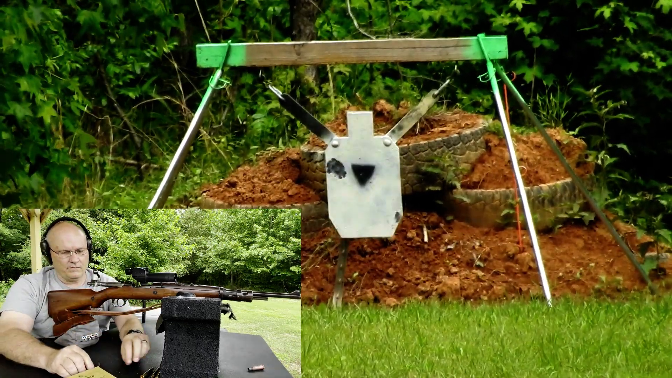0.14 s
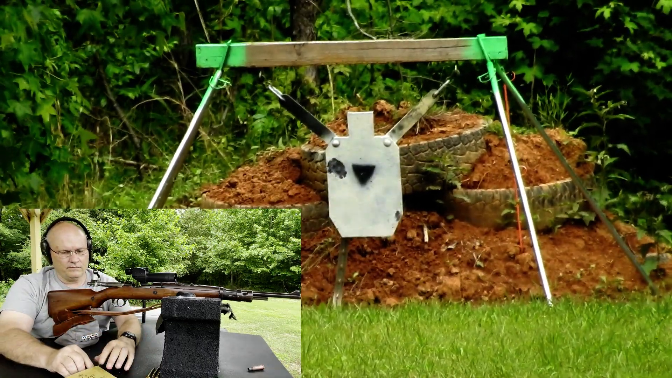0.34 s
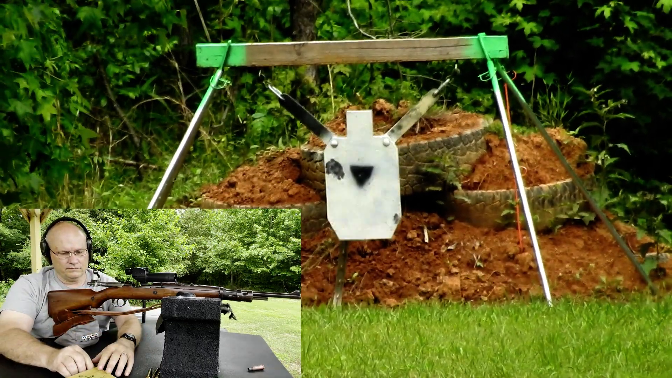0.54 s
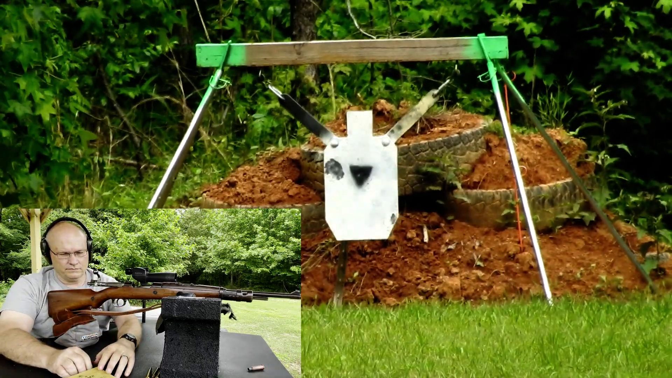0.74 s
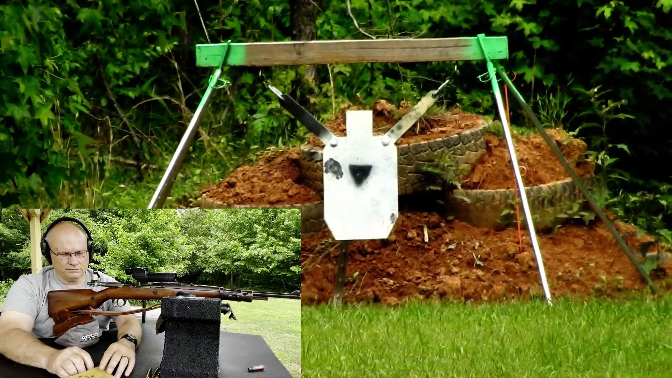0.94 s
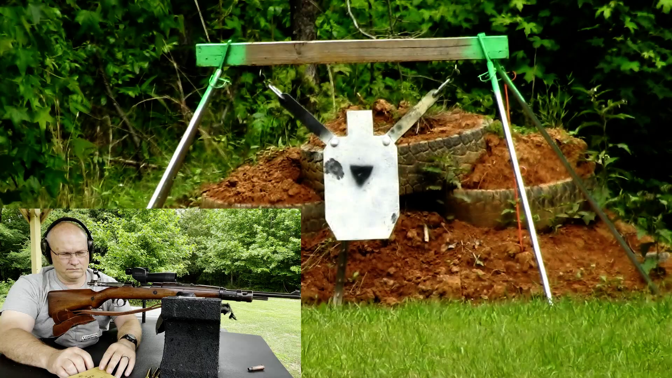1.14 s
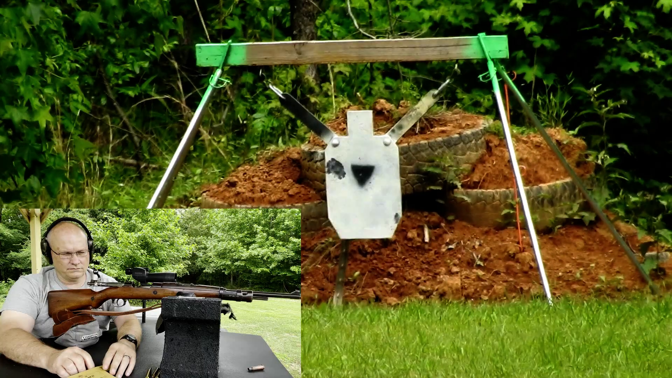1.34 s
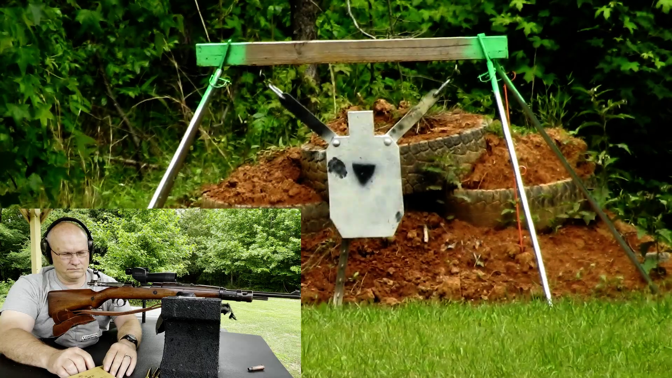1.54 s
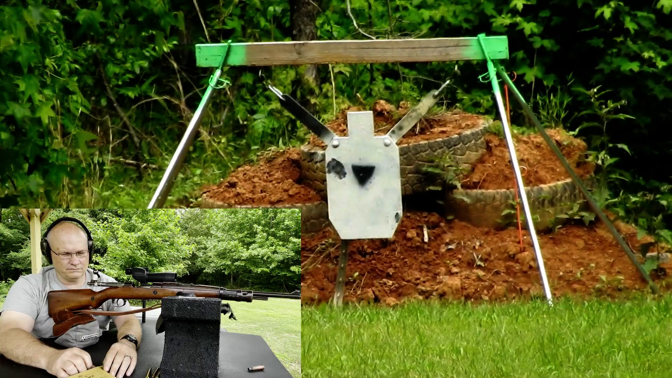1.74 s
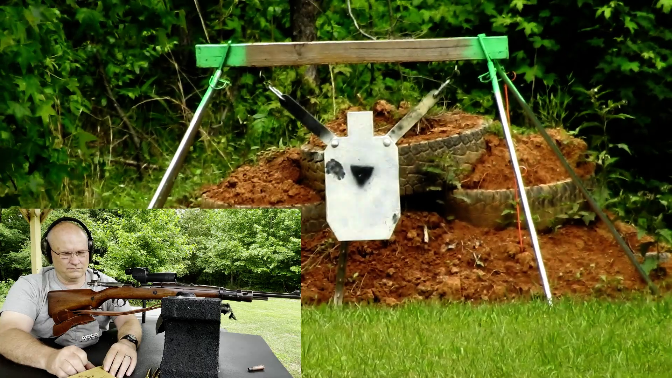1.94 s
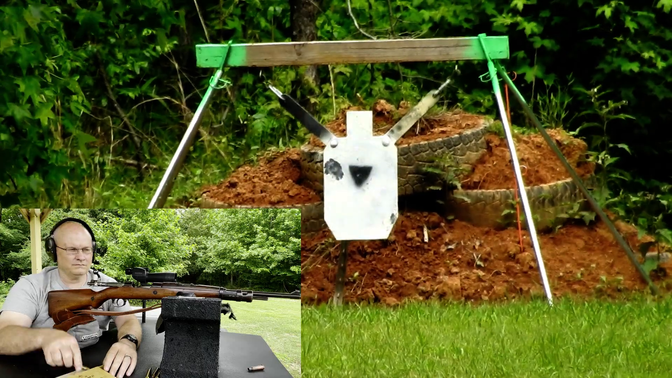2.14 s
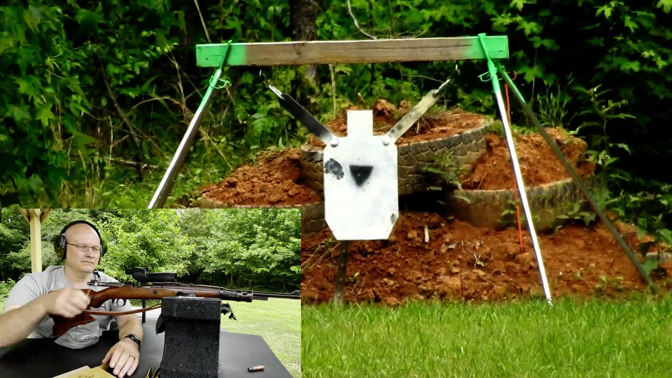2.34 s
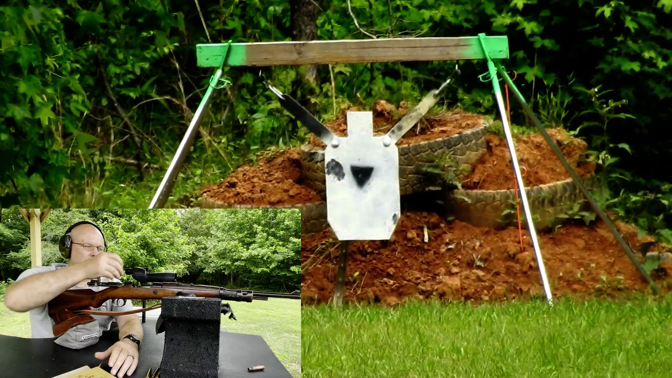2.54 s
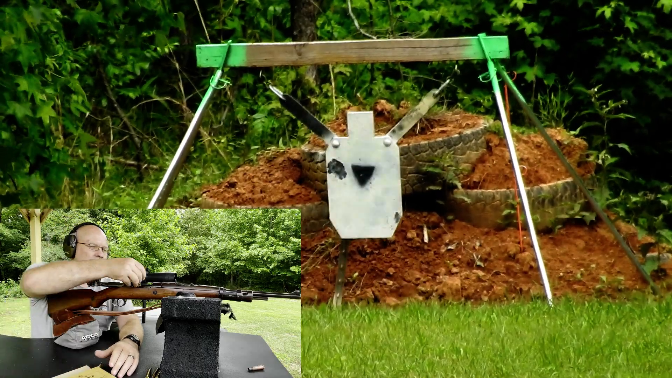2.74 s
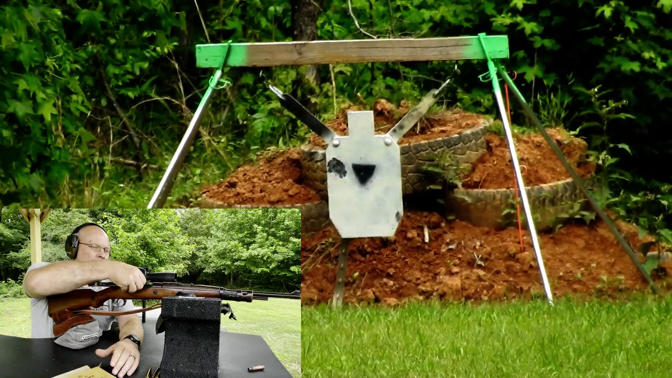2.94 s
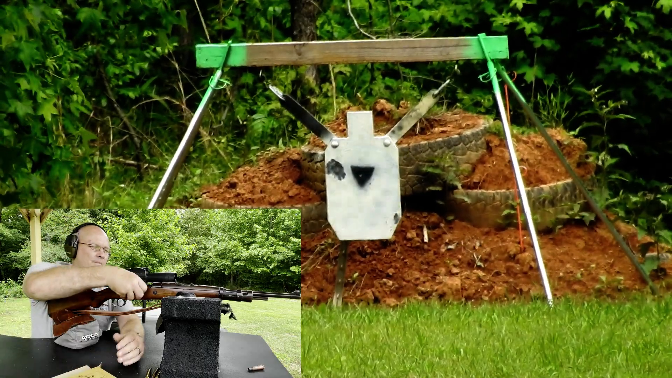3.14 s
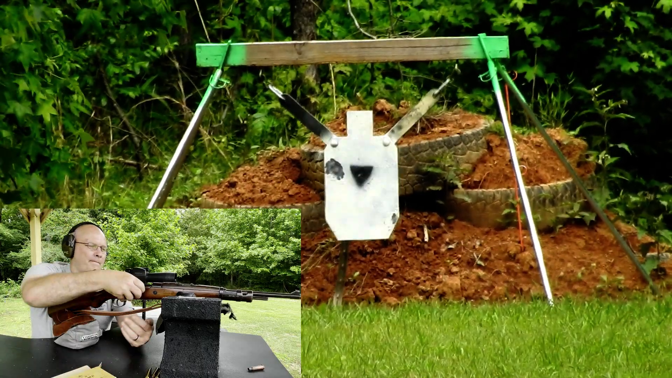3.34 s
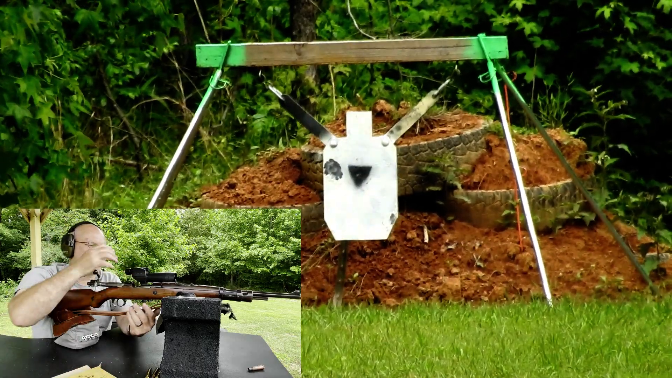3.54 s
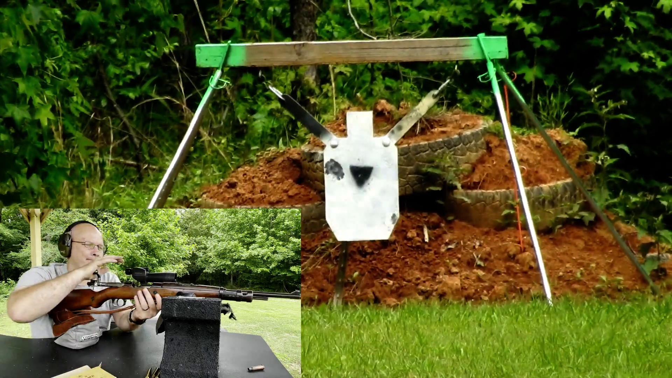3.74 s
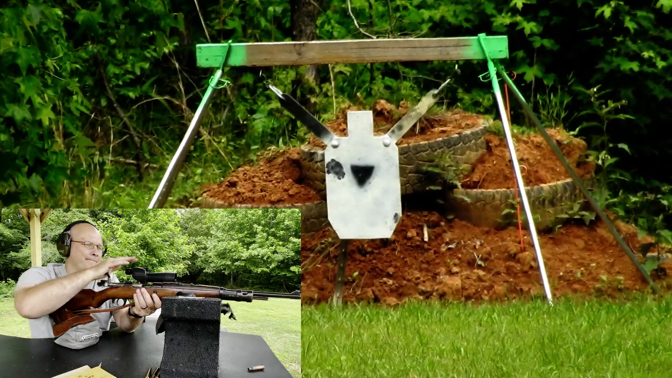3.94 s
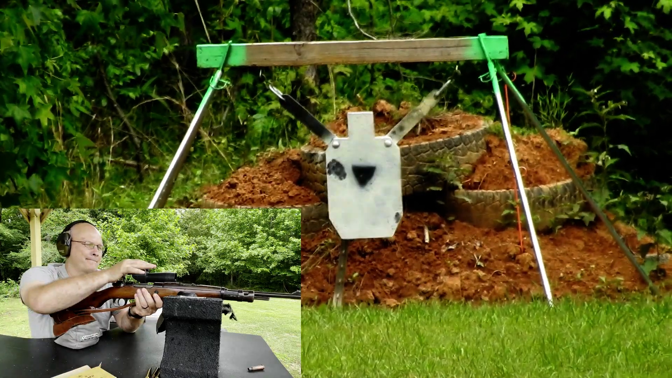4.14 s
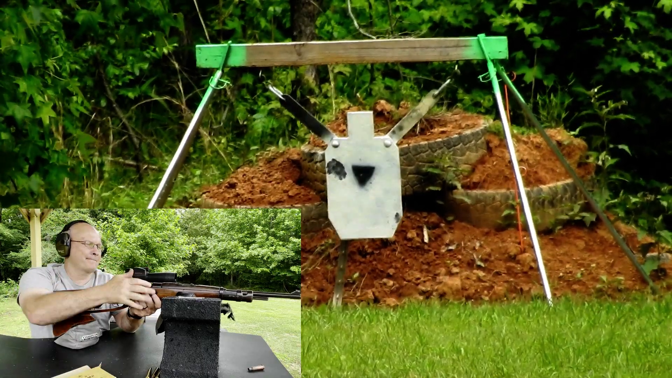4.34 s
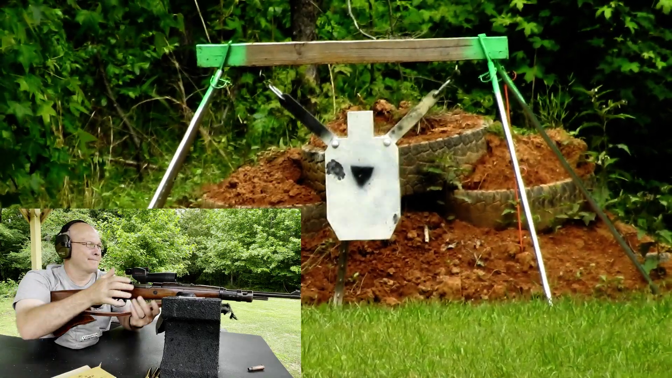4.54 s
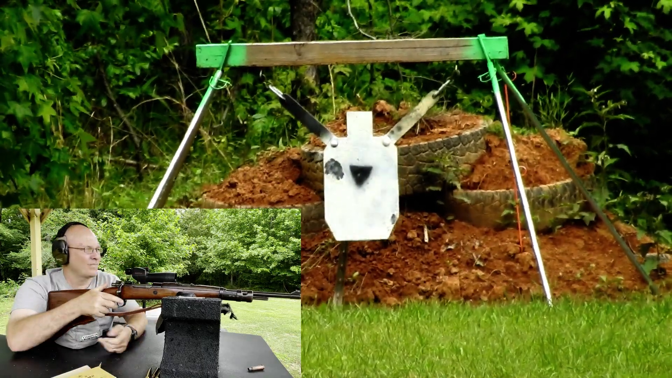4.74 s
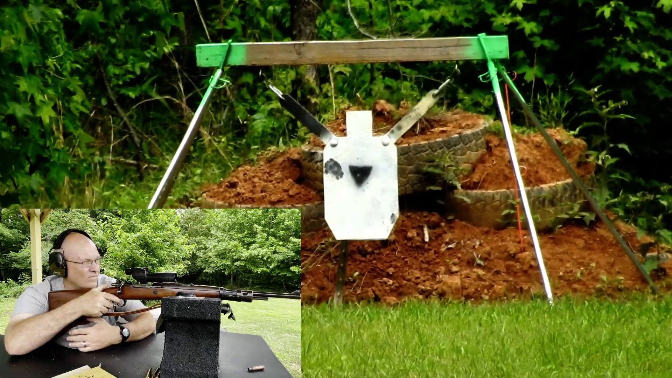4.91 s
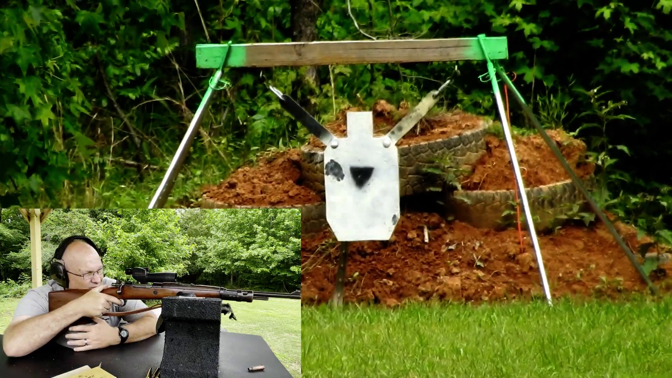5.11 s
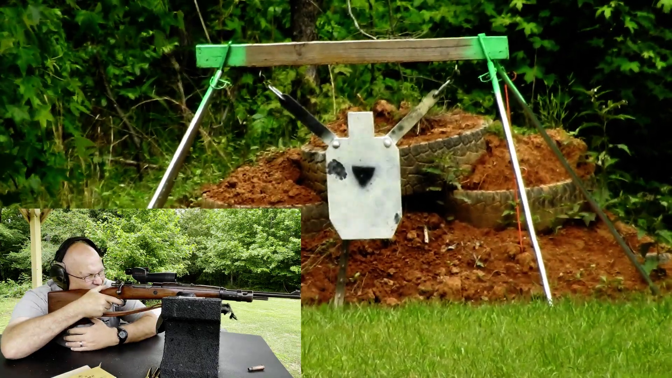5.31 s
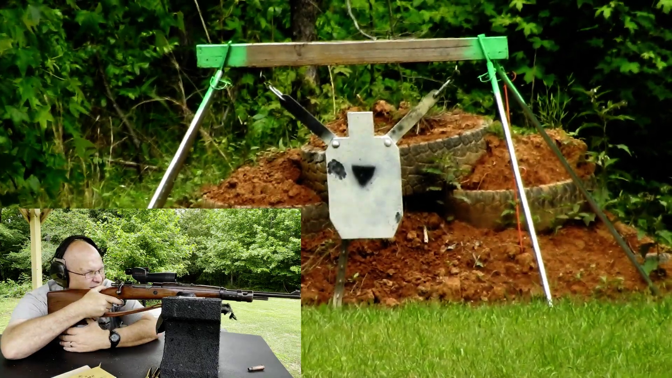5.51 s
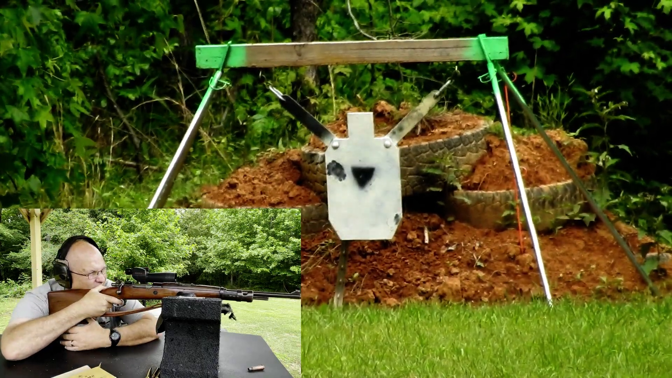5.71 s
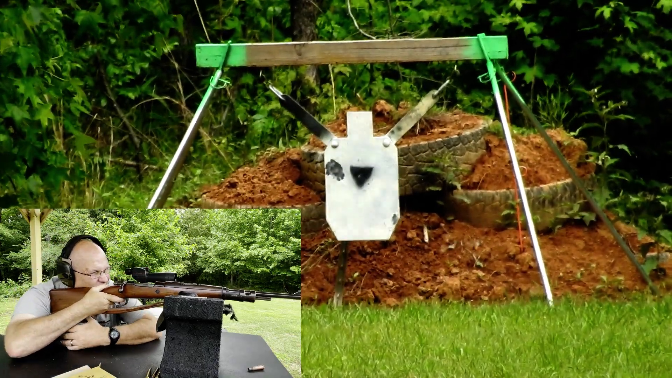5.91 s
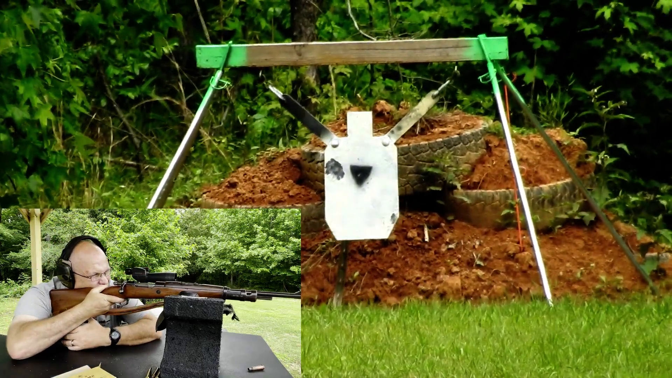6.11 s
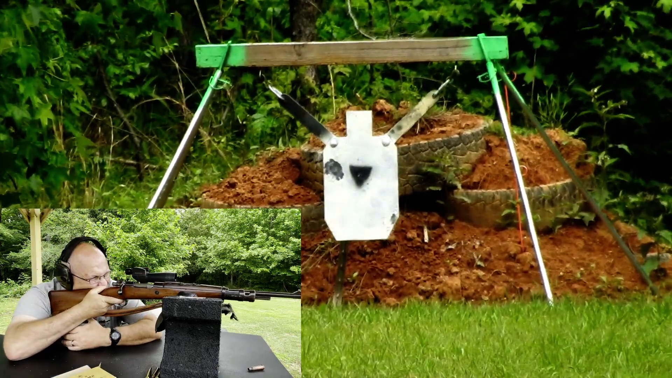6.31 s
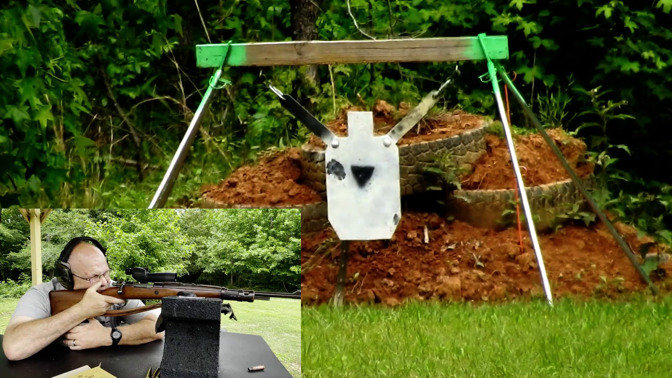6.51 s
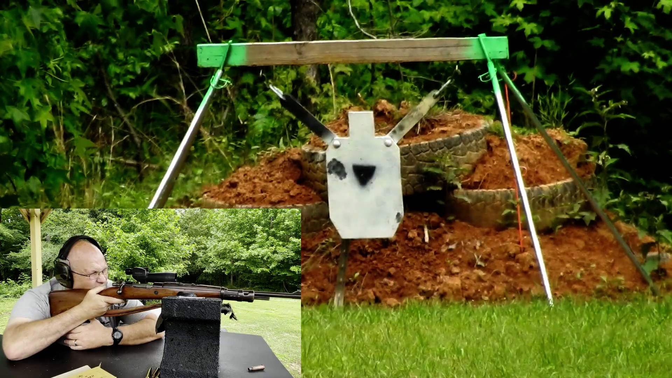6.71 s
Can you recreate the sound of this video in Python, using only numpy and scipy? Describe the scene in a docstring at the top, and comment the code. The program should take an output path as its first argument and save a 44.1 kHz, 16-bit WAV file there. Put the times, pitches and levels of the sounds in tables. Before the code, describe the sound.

Close stereo microphones at a bench under a shelter roof outdoors. Faint box knocks, cloth brushes and a tiny brass clink come first, then a cartridge taps the bench. A rifle bolt is lifted, drawn back hard to its stop, pushed forward on a round and locked down, in bright rattling steel clacks with short roof echo. Afterwards only hiss, soft dull wind puffs and a far bird's falling call. No shot is fired.

```python
"""At a bench under a shelter roof, a brass case clinks, soft knocks sound on the bench and cloth brushes, close
to two microphones. A far bird calls; a cartridge knocks on the bench. A rifle bolt is then opened, drawn back,
pushed home on a cartridge and locked: clusters of ringing steel contacts with rough sliding noise between. Roof
and posts throw the blows back at once, trees more faintly. Wind puffs, mostly later, are dull tones on one
microphone or the other; the bird, two gliding tones, calls again near the end. Filtered-noise hiss runs
throughout."""
import sys
import numpy as np
from scipy import signal
from scipy.fft import rfft, irfft, next_fast_len
from scipy.io import wavfile
from scipy.ndimage import uniform_filter1d, minimum_filter1d

SR = 44100
rng = np.random.default_rng(int(sys.argv[2]) if len(sys.argv) > 2 else 0)


def transcribe(u):
    """Save the signal u as a 16-bit wav file named by the first command-line argument.

    u: samples, shape (n,) or (channels, n), limited to [-1, 1]; the rate is SR.
    q: integer samples, one column per channel.
    """
    v = np.clip(np.atleast_2d(u).T, -1, 1)
    q = np.round(v * 32767).astype(np.int16)
    wavfile.write(sys.argv[1], SR, q)


N = 298248
SECONDS = np.arange(N) / SR
AGE = SECONDS[:SR // 2]  # seconds since a blow


def undb(db):
    """Decibels to gain."""
    return 10 ** (np.asarray(db) / 20)


def unit(x):
    """Scale to rms 1."""
    return x / np.sqrt(np.mean(x ** 2))


def fade(t60):
    """Exponential decay after a blow, down 60 dB at t60 seconds."""
    return np.exp(-np.log(1000) * AGE / t60)


def swell(rise_s):
    """A soft rise to 1 and a fall."""
    return (AGE / rise_s) ** 2 * np.exp(2 - 2 * AGE / rise_s)


def humps(table):
    """Gain over time of smooth swells, each down to 1/e at half_s from its middle."""
    return sum(undb(db) * np.exp(-((SECONDS - middle_s) / half_s) ** 2)
               for middle_s, db, half_s in table)


def across(points, size):
    """A (Hz, value) table read at every frequency of a sound of this size."""
    hz, value = np.transpose(points)
    return np.interp(np.log(np.fft.rfftfreq(size, 1 / SR) + 1), np.log(hz), value)


def colour(x, points):
    """Filter by a (Hz, dB) table."""
    size = next_fast_len(x.shape[-1])
    spectrum = rfft(x, size) * undb(across(points, size))
    return irfft(spectrum, size)[..., :x.shape[-1]]


# Likeness of the two microphones for close sounds: pitch_hz, likeness (0-1)
NEAR = [(100, 1), (500, 0.99), (1500, 0.98), (3000, 0.89), (6000, 0.66), (10500, 0.4)]
# The same for wide or distant sounds: pitch_hz, likeness (0-1)
FAR = [(60, .02), (150, 0.66), (300, 0.84), (600, 0.93), (1200, 0.87), (2600, 0.7), (5500, 0.43),
       (11000, 0.05)]


def noise(points, likeness, length):
    """Stereo noise of a given spectrum; likeness sets how far the channels share a middle signal."""
    size = next_fast_len(length)
    mid, side = rfft(rng.standard_normal((2, size))) * undb(across(points, size))
    alike = np.clip(across(likeness, size), 0, 1)
    mid = mid * np.sqrt(1 + alike)
    side = side * np.sqrt(1 - alike)
    return unit(irfft(np.array([mid + side, mid - side]), size)[:, :length])


def ring(modes, scatter_db=5.0, detune=0.0016):
    """Decaying modes; every blow weights them anew, and high ones reach the two microphones out of step."""
    out = 0
    for hz, db, t60 in modes:
        weight, drift, path, skew = rng.standard_normal(4)
        phase = hz * (path / 2500 + np.array([[1], [-1]]) * skew / 14000)
        tone = np.sin(2 * np.pi * hz * (1 + detune * drift) * AGE + phase)
        out = out + undb(db + scatter_db * weight) * fade(t60) * tone
    return out


def blow(x, count=220):
    """The first quarter second of a blow, scaled to rms 1 over its attack of count samples."""
    return x[:, :SR // 4] / np.sqrt(np.mean(x[:, :count] ** 2))


def add(out, start_s, x):
    """Mix x into out at time start_s."""
    i = int(start_s * SR)
    out[:, i:i + x.shape[1]] += x[:, :N - i]


# Clacks of the action: handle lifted from 2.84 s, bolt drawn back 3.20, rear stop 3.34, pushed forward 3.86,
# cartridge stripped and fed 3.99, bolt home 4.10, handle locked down 4.31.
# start_s, level_db, touches before, first touch_db, rebounds after,
# thud_db, stock_db, receiver_db, edge_db (band levels), strongest ring pitch_hz
CLACKS = [(2.837, -18.5, 1, -5.5, 0, -14, -0.5, -1.5, -2.5, 6500),
          (2.854, -31.5, 0, 0, 0, -6, 16, 2, -2, 6550), (2.967, -28.5, 1, -8, 0, -15, 1, 4, -1, 6450),
          (3.0153, -13, 2, -15, 4, -18, -7.5, -5, -4.5, 6230),
          (3.1997, -6.5, 2, -20.5, 1, -17, -6, -0.5, 3.5, 5930),
          (3.34, -11.5, 3.5, -11.5, 2, -14.5, -5, -6.5, -4.5, 6300),
          (3.86, -15.5, 1, -3, 0, -19, -11.5, 1, -4.5, 4850), (3.898, -31, 1, -6, 0, 5, 12, -7, -17, 6460),
          (3.921, -25.5, 1, -0.5, 0, -3, 5, -3, -11, 6460),
          (3.9611, -18.5, 1, -6, 0, -3, -1, 2.5, -6, 4500), (3.99, -9, 3, -11.5, 0, -7, -1.5, -1, -2, 4400),
          (4.021, -13.5, 1, -8, 2, -10, -3, -1.5, -5, 5900),
          (4.058, -20.5, 1, -8, 0, -9, -4, -10, 3.5, 6750), (4.099, -12, 2, -22, 1, 1, 7.5, -1, -9, 5900),
          (4.138, -30, 0, 0, 0, -4, 9, -5, -8, 4900), (4.282, -29.5, 1, -8, 0, -6, 3, -3, -15, 5640),
          (4.3108, -11.5, 0, 2, 1.5, 1.5, 1, -0.5, -10, 6200)]
CHATTER_S, CHATTER_SCATTER = .0049, .08  # time between loose contacts, its scatter as a share
REBOUND_DB = -2.5  # scale of the rebounds' fading
TOUCH_DULLING = .45  # dB more wood per dB that a contact is lighter


def chatter():
    """Clacks as quick runs of loose steel contacts: growing touches, the blow, fading rebounds."""
    for start_s, db, touches, touch_db, rebounds, thud, stock, receiver, edge, hz in CLACKS:
        for k in range(-int(round(touches)), int(round(rebounds)) + 1):
            if k < 0:
                lighter = touch_db * -k / touches
            else:
                lighter = REBOUND_DB * np.sqrt(k / max(rebounds, 1))
            delay = CHATTER_S * (k + CHATTER_SCATTER * np.sign(k) * rng.standard_normal())
            wood = -TOUCH_DULLING * lighter
            yield start_s + delay, db + lighter, thud + wood, stock + wood, receiver, edge, hz


# Spectrum of a blow on the action: pitch_hz, level_db
ACTION = [(100, -35), (330, -13.5), (600, -8.5), (950, -12.5), (1300, -7.5), (1700, -17), (2400, -13),
          (3700, -10), (4300, -2.5), (5300, -6), (6500, 0.5), (7100, -6.5), (8000, -15.5), (10500, -18.5),
          (12000, -36)]
# Modes of bolt and receiver: pitch_hz, level_db, t60_s
STEEL = [(1174, -17.5, 0.087), (1334, -15, 0.067), (1860, -17.5, 0.065), (3010, -16.5, 0.066),
         (4000, -33, .09), (4300, 0, 0.045), (4430, -5, 0.036), (4640, -9.5, 0.06), (4920, -9, 0.063),
         (5480, -12, .09), (6000, -6, 0.046), (5940, -9, 0.05), (6600, -3.5, 0.047), (6140, -9, 0.048),
         (6720, -2, 0.051), (7110, -6, .05), (8600, -14, 0.06), (10100, -30, .06)]
# The bolt body singing on after its rear stop: pitch_hz, level_db, t60_s
STOP_RING = [(1338, -30, 0.24), (1370, -35, .12), (1850, -40, .11), (5900, -26, .11)]
STOP_S = 3.33


def contacts(crack_t60=0.024, rise_s=0.0013, ring_db=-16, ring_width_hz=350, focus_db=5, low_db=-6):
    """Steel meets steel: a dense crack and the ringing action, coloured by where the blow lands."""
    out = np.zeros((2, N))
    for start_s, db, thud, stock, receiver, edge, hz in chatter():
        crack = noise(ACTION, NEAR, len(AGE)) * fade(crack_t60)
        # grip and bolt position detune the modes from blow to blow
        hit = crack + undb(ring_db) * ring(STEEL, scatter_db=3.5, detune=0.0127)
        hit = colour(hit, [(hz - 2 * ring_width_hz, 0), (hz, focus_db), (hz + 2 * ring_width_hz, 0)])
        # the vibration takes a moment to spread through the steel
        hit = hit * (1 - np.exp(-AGE / rise_s))
        # blows along the barrel shake the wooden stock; sharp corners add the top octave
        tone = [(120, thud / 2 + low_db), (700, thud), (1200, stock), (1900, stock),
                (2500, stock / 2 - 3), (3100, stock / 2), (3700, stock / 2 - 3),
                (4300, receiver), (5500, 0), (7000, 0), (8800, edge)]
        add(out, start_s, undb(db) * blow(colour(hit, tone)))
    add(out, STOP_S, ring(STOP_RING, scatter_db=3, detune=0))
    return signal.sosfilt(signal.butter(2, 110, "high", fs=SR, output="sos"), out)


# Strokes of the bolt in its raceway: middle_s, level_db, half_s
STROKES = [(2.92, -33, .05), (3.91, -45, .04), (4.005, -22, 0.034), (4.06, -39.5, 0.059)]


def sliding(grit_db=3, count=36):
    """The bolt scrapes in tiny uneven catches, each count samples long."""
    catches = np.repeat(undb(grit_db * rng.standard_normal(N // count + 1)), count)[:N]
    scrape = noise([(200, -25), (1300, -7.0), (3300, -10), (4500, -10), (6500, 3.0),
                    (8200, -14), (11000, -50)], NEAR, N)
    return scrape * unit(catches) * humps(STROKES)


# Cartridge on the bench: start_s, level_db, contact brightness_hz
TAPS = [(2.0652, -19.5, 1290), (2.071, -27.5, 4700), (2.1291, -25, 2510), (2.1303, -37, 380),
        (2.134, -30, 5760)]
# Modes of the bench top: pitch_hz, level_db, t60_s
BENCH = [(470, -17, 0.052), (808, -9.5, 0.056), (1204, -6.5, .085), (1310, -13, 0.064), (1540, -17, 0.063),
         (1724, -17, 0.03), (2150, -16, 0.025), (2496, -7, 0.021), (2630, -9, 0.02), (3100, -16, 0.018)]


def bench_taps(crack_t60=0.02, slope_db=10, rise_s=0.00027):
    """A cartridge knocks on the bench top and rocks back; each contact has its own brightness."""
    out = np.zeros((2, N))
    for start_s, db, hz in TAPS:
        crack = noise([(200, 3), (1000, 1.0), (2700, -2.0), (3700, -13.5), (6500, -4),
                       (8500, -25), (11000, -35)], NEAR, len(AGE))
        hit = ring(BENCH, scatter_db=1.5) + crack * fade(crack_t60)
        hit = hit * (1 - np.exp(-AGE / rise_s))
        hit = colour(hit, [(hz / 4, -2 * slope_db), (hz, 0), (hz * 4, -slope_db)])
        add(out, start_s, undb(db) * blow(hit))
    return out


# Sleeve and fingers brushing: middle_s, level_db, half_s
BRUSHES = [(.415, -38.5, 0.0089), (0.7, -45.5, 0.036), (0.858, -43, 0.039), (1.162, -45, .008),
           (1.909, -40.5, 0.013), (2.06, -44, 0.095), (4.624, -42, 0.012), (4.83, -46, 0.082),
           (5.36, -45.5, 0.16), (5.87, -45, 0.047)]
# Soft knocks on the bench: start_s, level_db, pitch_hz
KNOCKS = [(0.031, -42.5, 512), (0.096, -44.5, 458), (0.504, -39, 617), (1.157, -36, 622)]
# Brass case clinking: pitch_hz, level_db, t60_s
BRASS = [(10000, -39.5, 0.08), (9990, -60, 0.44), (8624, -59, 0.55)]
CLINK_S = 0.279


def handling(rise_s=0.007, hollow=0.5):
    """Brushing cloth and fingers are swelling noise, soft knocks on the bench are dull tones, a brass case
    rings once."""
    cloth = noise([(200, -13), (1200, 6.0), (3500, 0.5), (4700, 7), (6800, 8),
                   (8500, -11), (11000, -18)], FAR, N)
    out = humps(BRUSHES) * cloth
    for start_s, db, hz in KNOCKS:
        air = noise([(hz / 2, -20), (hz, 0), (hz * 1.6, -1), (hz * 3, -30)], NEAR, len(AGE))
        knock = np.sin(2 * np.pi * hz * AGE) + hollow * air
        add(out, start_s, unit(knock) * swell(rise_s) * undb(db))
    add(out, CLINK_S, ring(BRASS))
    return out


# Arm and rifle shifting their weight on the bench: middle_s, level_db, half_s
SHIFTS = [(2.28, -52.5, 0.17), (4.06, -47, .11), (4.42, -49, 0.11), (4.69, -50, 0.044)]


def rumble():
    """The bench rumbles faintly, as low noise, while weight shifts on it."""
    return humps(SHIFTS) * noise([(20, -19), (50, -2), (90, 2.5), (160, -4), (400, -38.5)], FAR, N)


def shelter(x, roof_s=.0156, roof_db=-11, tail_db=-8, tail_t60=0.13, build_s=0.0061):
    """One clear echo off the roof, and a short scatter off bench and posts."""
    tail = noise([(100, 5.5), (1500, 0.0), (6000, -5.5), (11000, -4.5), (14000, -32)], NEAR, len(AGE))
    tail = tail * fade(tail_t60) * (1 - np.exp(-(AGE / build_s) ** 2))
    tail = tail / np.sqrt(np.sum(tail ** 2))
    out = x + undb(tail_db) * signal.fftconvolve(x, tail, axes=1)[:, :N]
    add(out, roof_s, undb(roof_db) * x)
    return out


def trees(x, echo_db=-27, echo_t60=0.75, build_s=.04):
    """The trees around scatter back a faint, longer tail."""
    tail = noise([(150, 0), (1300, -16), (3500, 1), (6500, 5), (10000, 1)], FAR, len(AGE))
    tail = tail * fade(echo_t60) * (1 - np.exp(-AGE / build_s))
    tail = tail / np.sqrt(np.sum(tail ** 2))
    return undb(echo_db) * signal.fftconvolve(x, tail, axes=1)[:, :N]


# Wind puffs on the microphone ports: start_s, level_db (before gain_db), pitch_hz, left minus right_db
PUFFS = [(0.563, -36.5, 131, 12), (1.426, -35, 230, 28), (1.67, -37, 174, -4), (4.453, -33, 194, -29),
         (4.902, -25, 171, 27.5), (5.101, -31, 175, 28), (5.409, -30, 242, 26), (5.47, -35, 165, 9),
         (6.143, -25.5, 166, 29), (6.708, -35, 169, 21)]


def puffs(rise_s=0.0065, gain_db=-1, rough=0.27):
    """Small eddies cross one port or the other: a few dull cycles each."""
    out = np.zeros((2, N))
    for start_s, db, hz, pan_db in PUFFS:
        flutter = noise([(hz / 4, -15), (hz, 0), (hz * 1.64, -4), (hz * 4, -40)], FAR, len(AGE))
        eddy = np.sin(2 * np.pi * hz * AGE) + rough * flutter
        panned = unit(eddy * undb(np.array([[pan_db], [-pan_db]]) / 2))
        add(out, start_s, panned * swell(rise_s) * undb(db + gain_db))
    return out


# Far bird, two falling calls: start_s, length_s, starting pitch_hz, fall_hz, level_db
BIRD = [(1.811, 0.19, 7670, 1180, -47), (6.364, 0.33, 7620, 2010, -41.5)]


def bird(blur_hz=190, second_ratio=1.113, second_db=-6, bend=1.5, early=0.89):
    """Two thin tones that fall ever faster, blurred by the foliage."""
    out = 0
    for start_s, length_s, hz, fall_hz, db in BIRD:
        along = np.clip((SECONDS - start_s) / length_s, 0, 1)
        phase = 2 * np.pi * np.cumsum(hz - fall_hz * along ** bend) / SR
        loud = undb(db) * np.sqrt(np.abs(np.sin(np.pi * along ** early)))
        for ratio, voice_db in ((1, 0), (second_ratio, second_db)):
            # slow noise multiplies the tone and spreads its pitch
            blur = noise([(blur_hz / 2, 0), (blur_hz * 4, -18), (blur_hz * 10, -60)], FAR, N)
            out = out + loud * undb(voice_db) * blur * np.sin(ratio * phase)
    return out


# Spectrum of the steady hiss: pitch_hz, level_db (per Hz, relative)
HISS = [(18, -52), (30, -26), (60, -10), (91, -12), (165, -2.5), (284, -9), (355, -11), (382, -8.5),
        (489, -10), (582, -8.5), (1380, -10.5), (2500, -14), (3710, -19), (6390, -8.5), (11000, -41),
        (14300, -75), (22000, -120)]
# Swells of the breeze: middle_s, level_db (before the gusts), half_s
BREEZE = [(.5, -57, 0.28), (4.5, -57.5, 0.37), (5.2, -48.5, 0.39), (6.1, -53.5, 0.11), (6.75, -51, 0.17)]


def background(hiss_db=-43.5, lean_db=1.56, gust_db=6.5, count=1100):
    """Even noise hiss, its treble stronger on the right, over low noise swelling as an uneven breeze."""
    left, right = noise(HISS, FAR, N) * undb(hiss_db)
    left = colour(left, [(1000, 0.0039), (5000, -lean_db)])
    right = colour(right, [(1000, 0), (5000, lean_db)])
    # random levels, a new one every count samples, smoothed
    steps = np.repeat(rng.standard_normal((2, N // count + 1)), count, axis=1)
    gusts = uniform_filter1d(steps, count)[:, :N]
    breeze = noise([(25, -29), (70, -9.5), (160, -2.5), (300, -10.5), (900, -44)], FAR, N)
    return np.array([left, right]) + breeze * humps(BREEZE) * undb(gust_db * gusts)


def scene():
    """Rifle and bench under the roof, open air around."""
    blows = shelter(contacts()) + shelter(bench_taps(), roof_db=-10, tail_db=-7.5)
    close = sliding() + puffs() + handling() + rumble()
    return blows + trees(blows) + close + bird() + background()


CEILING, LIMITER_S, TOP_HZ = .9, .002, 10950


def record(dry):
    """The recorder's limiter holds peaks to the ceiling; a steep low-pass then cuts the top."""
    size = int(LIMITER_S * SR)
    gain = CEILING / np.maximum(np.abs(dry).max(axis=0), CEILING)
    gain = uniform_filter1d(minimum_filter1d(gain, size), size)
    low_pass = signal.ellip(8, .05, 50, TOP_HZ, fs=SR, output="sos")
    return signal.sosfiltfilt(low_pass, dry * gain)


dry = scene()
out = record(dry)
transcribe(out)
```